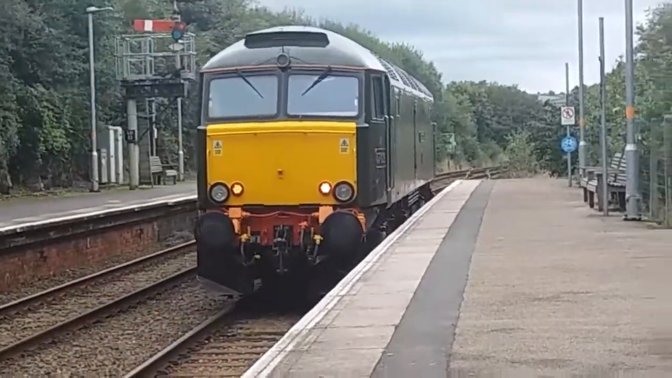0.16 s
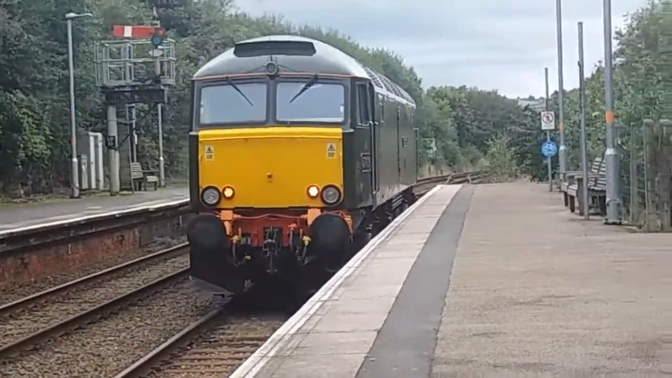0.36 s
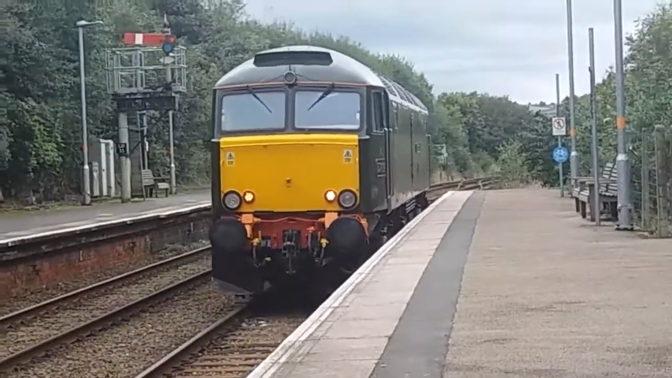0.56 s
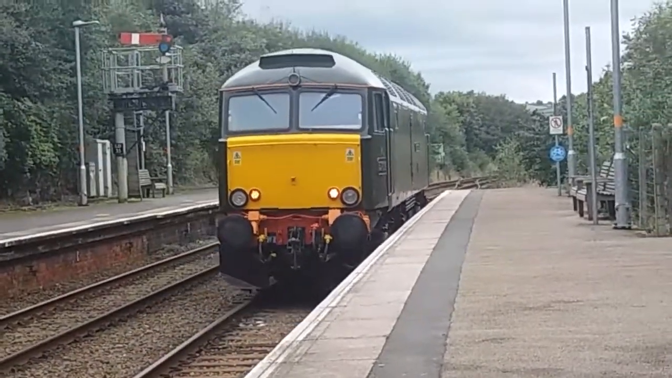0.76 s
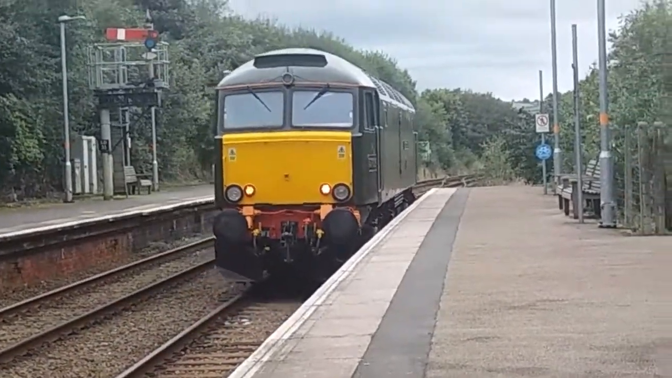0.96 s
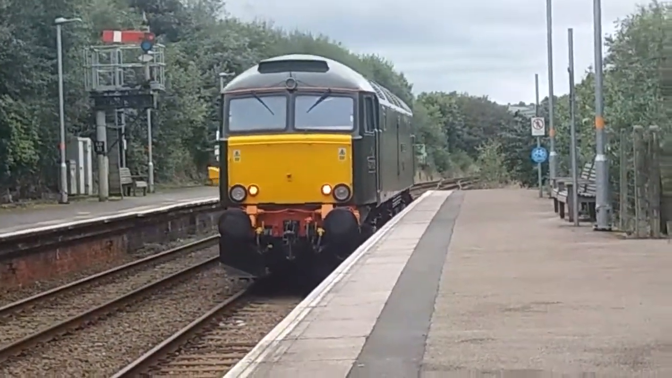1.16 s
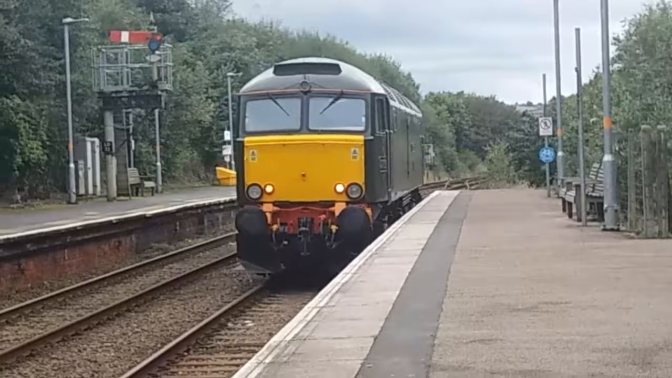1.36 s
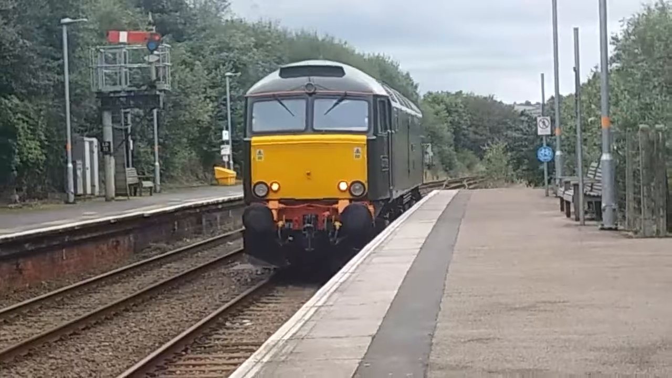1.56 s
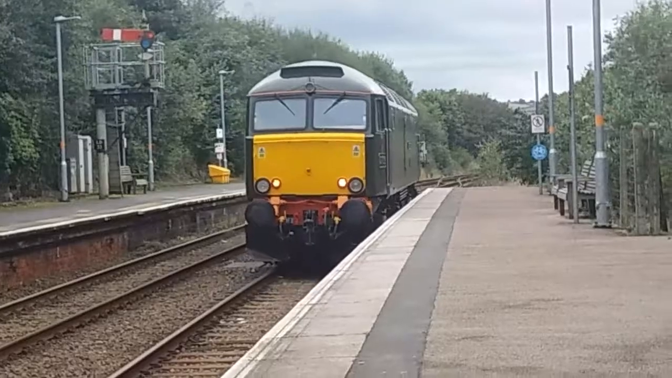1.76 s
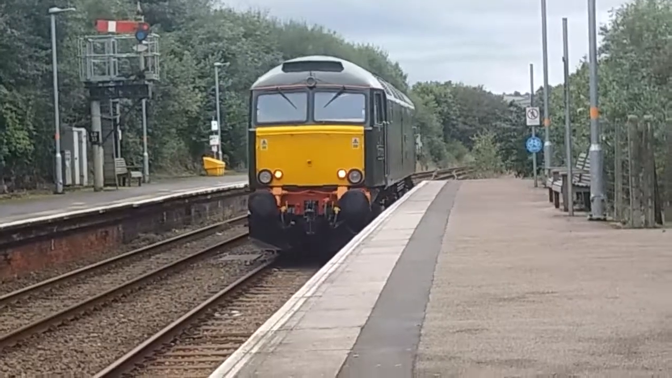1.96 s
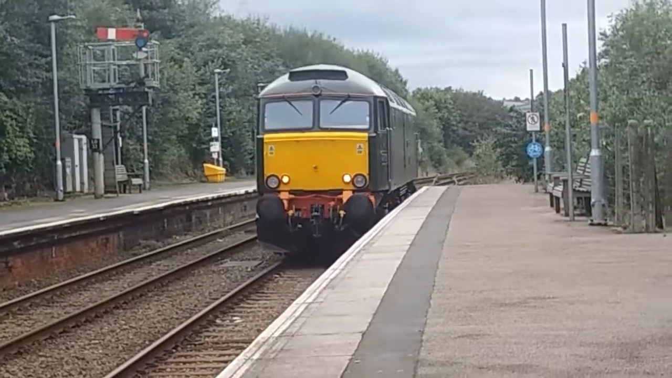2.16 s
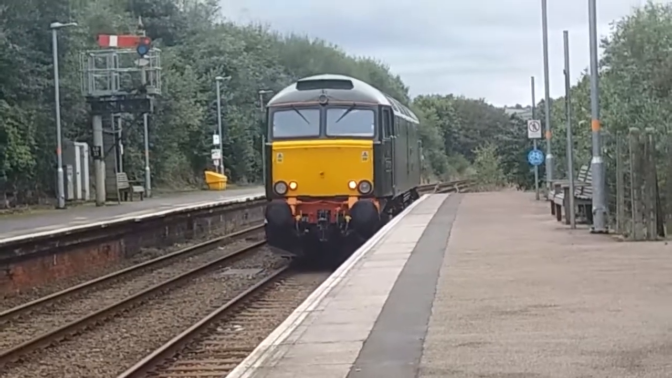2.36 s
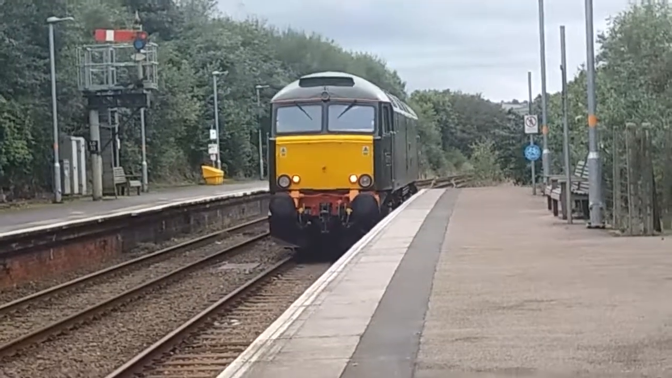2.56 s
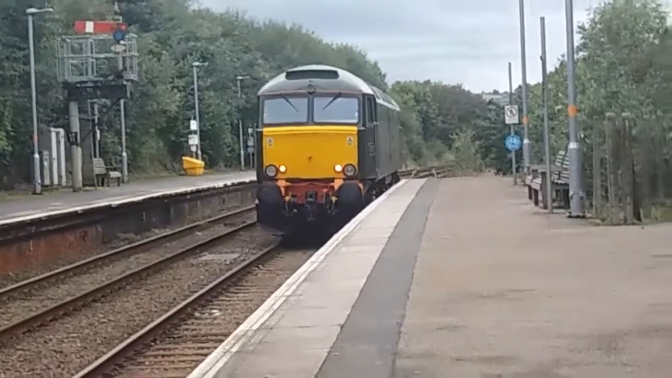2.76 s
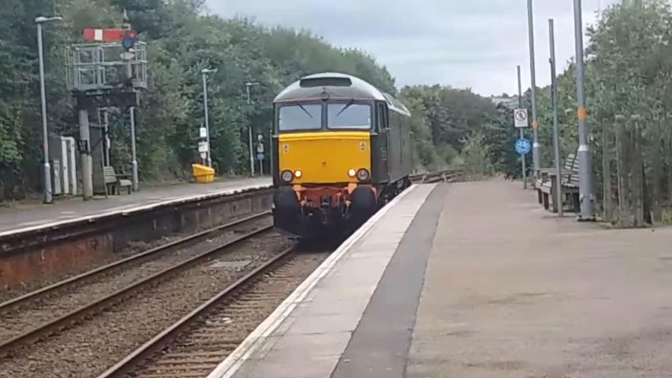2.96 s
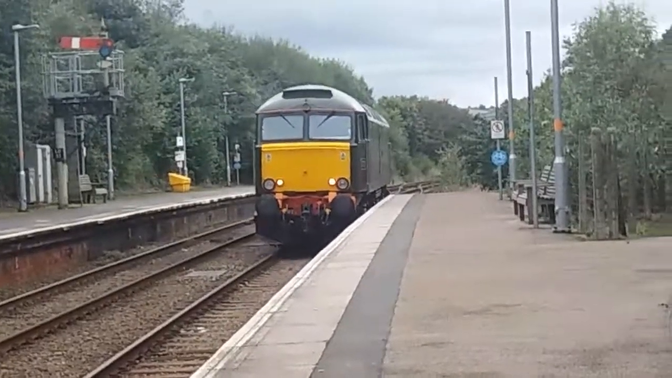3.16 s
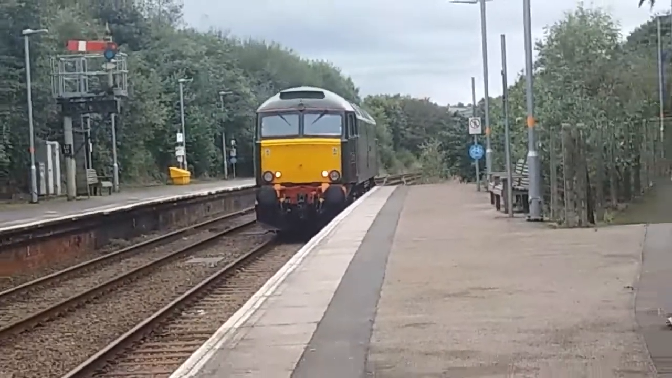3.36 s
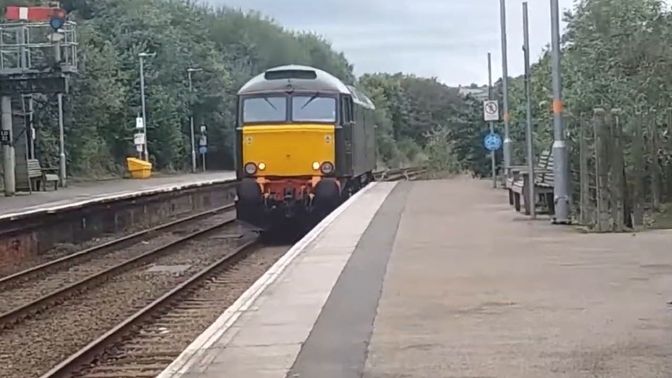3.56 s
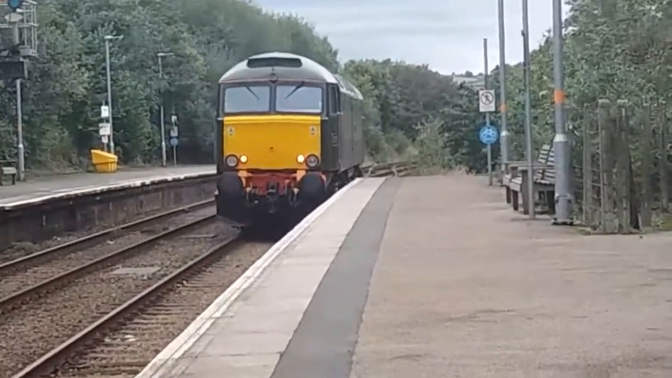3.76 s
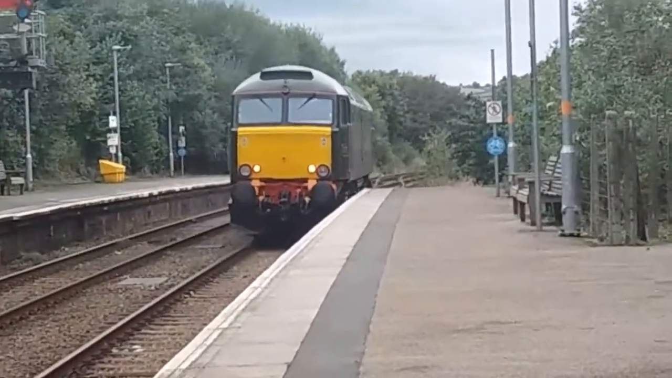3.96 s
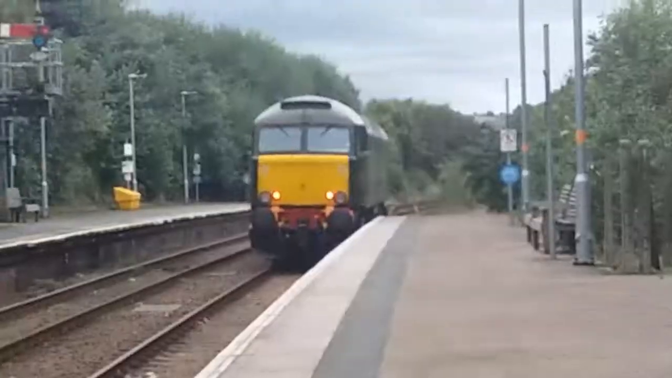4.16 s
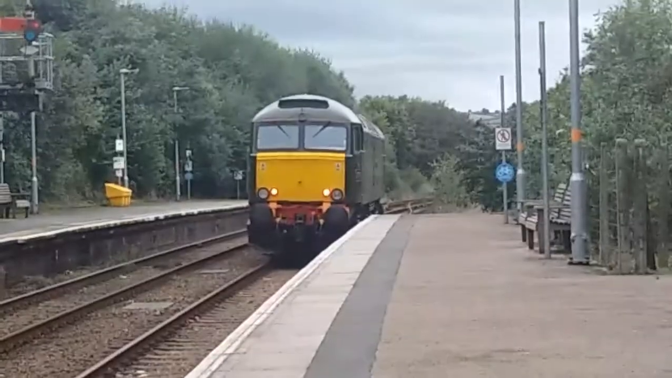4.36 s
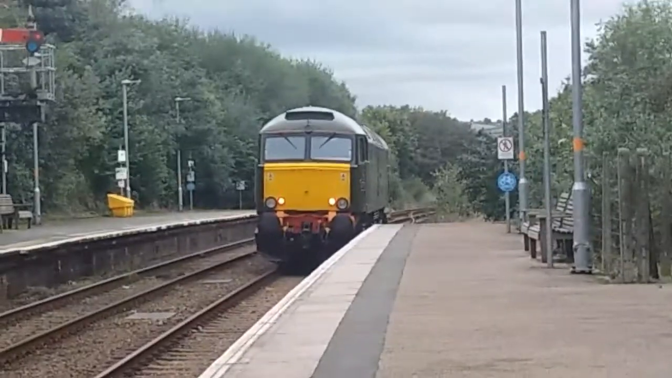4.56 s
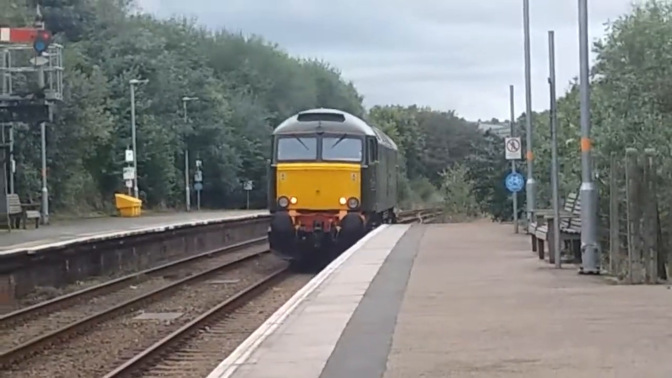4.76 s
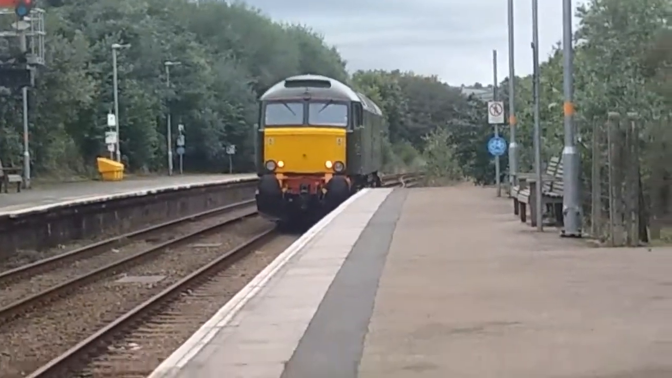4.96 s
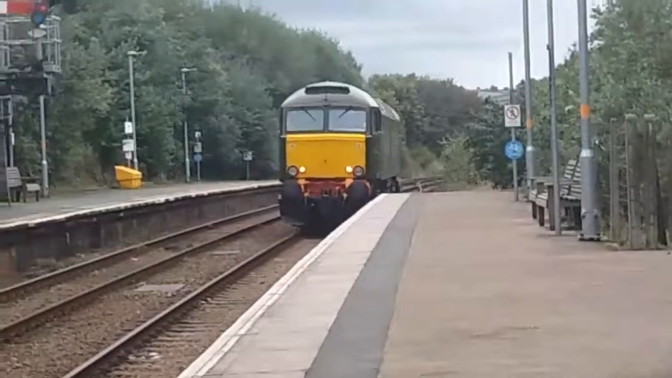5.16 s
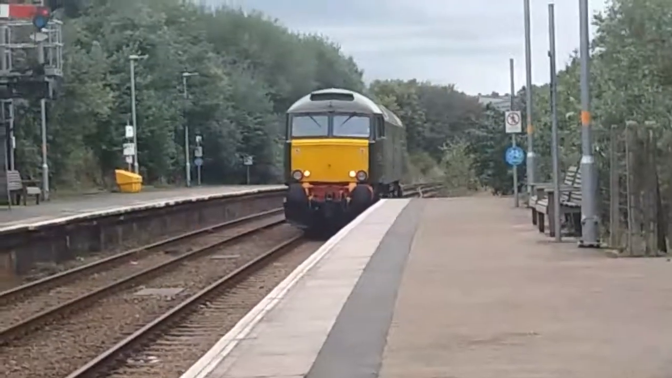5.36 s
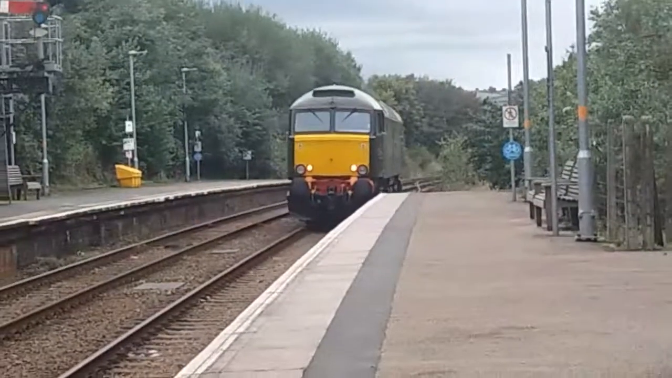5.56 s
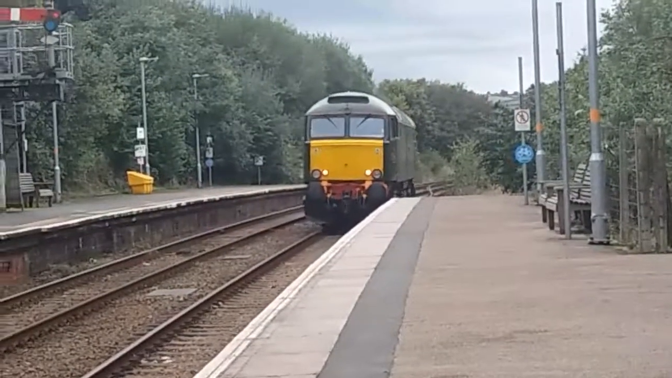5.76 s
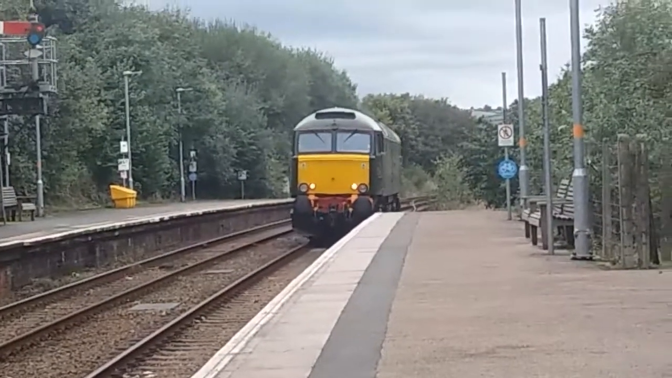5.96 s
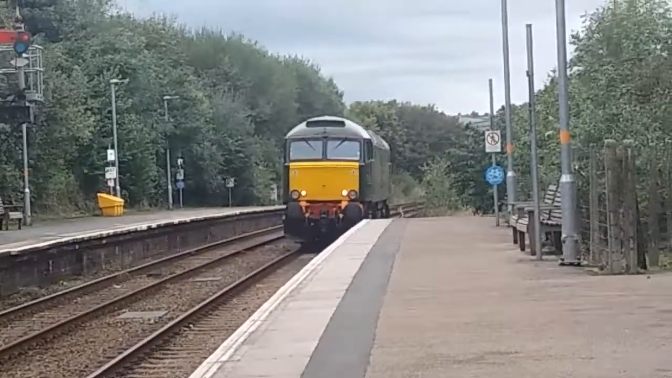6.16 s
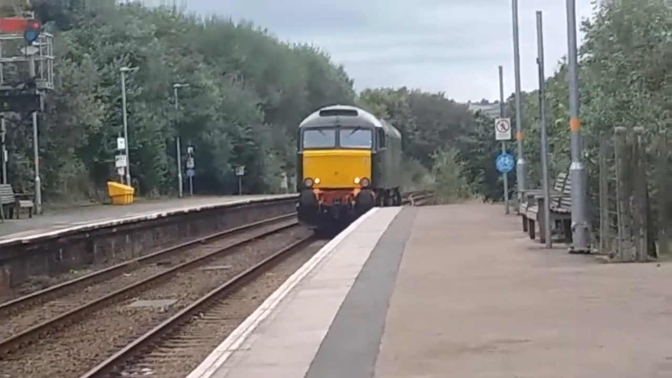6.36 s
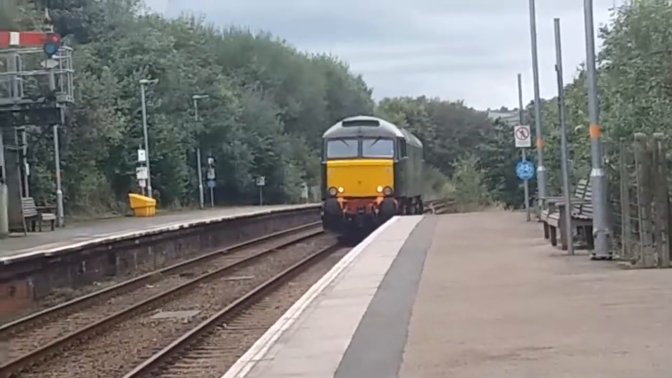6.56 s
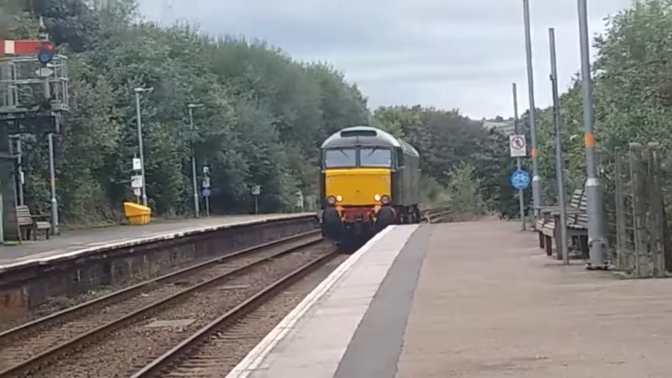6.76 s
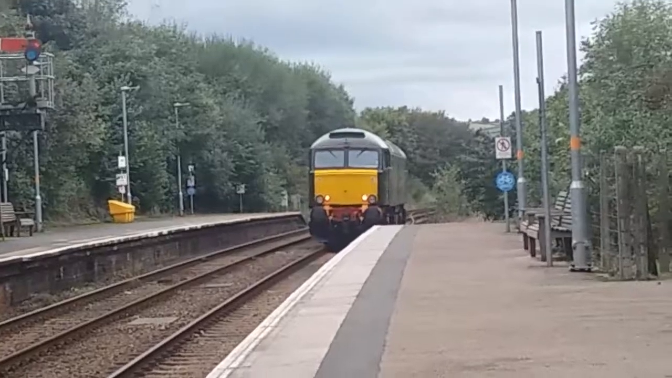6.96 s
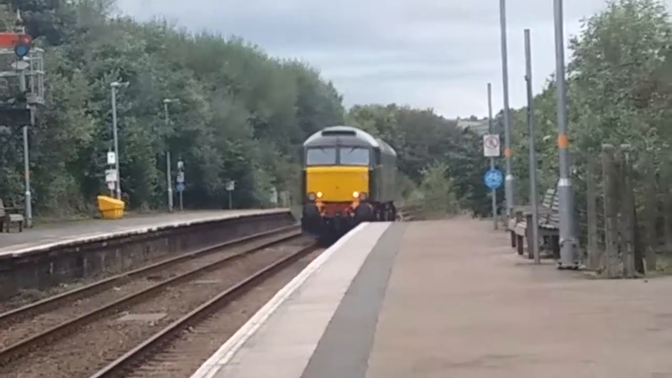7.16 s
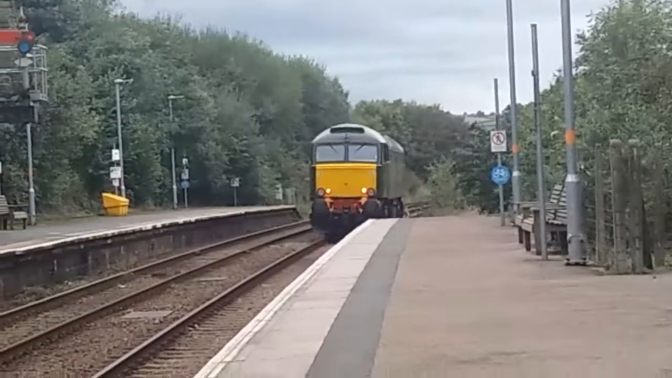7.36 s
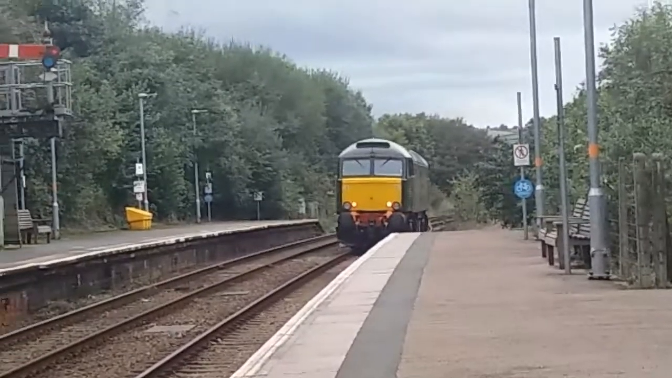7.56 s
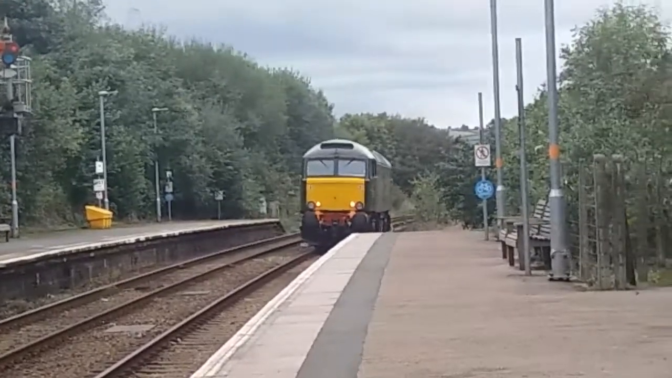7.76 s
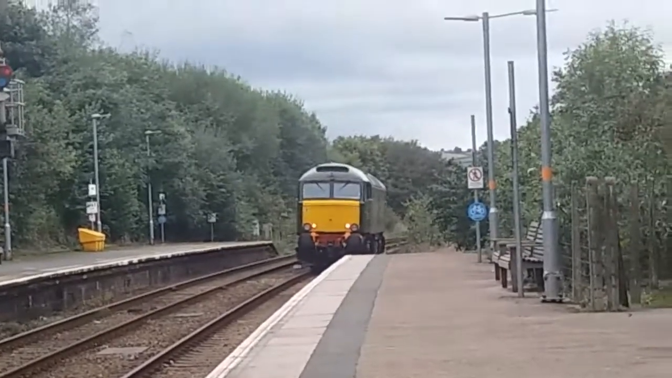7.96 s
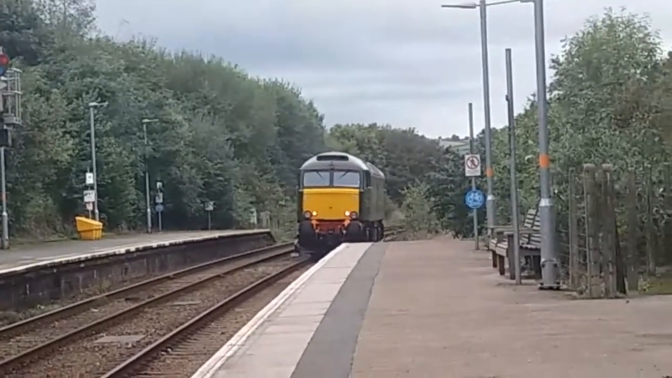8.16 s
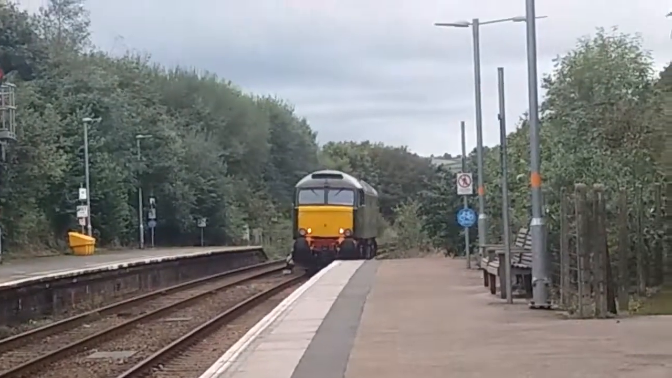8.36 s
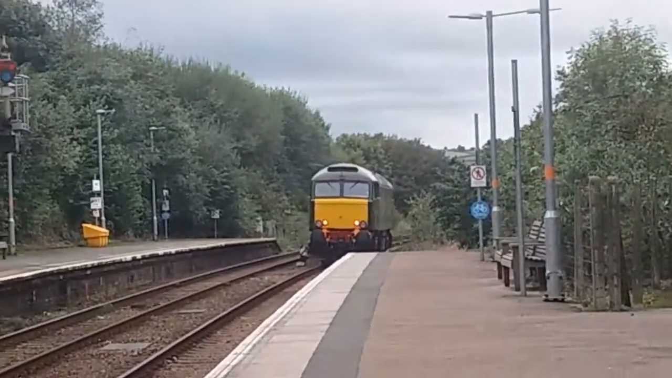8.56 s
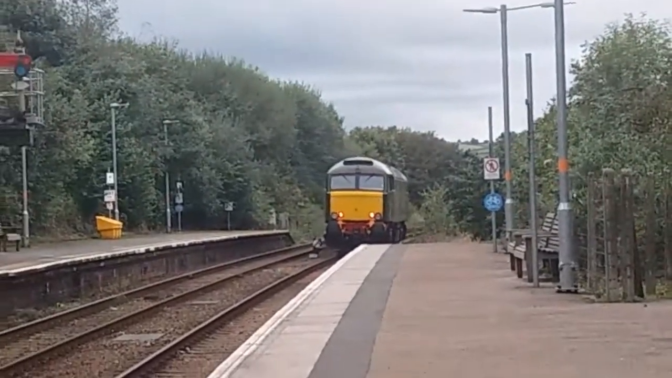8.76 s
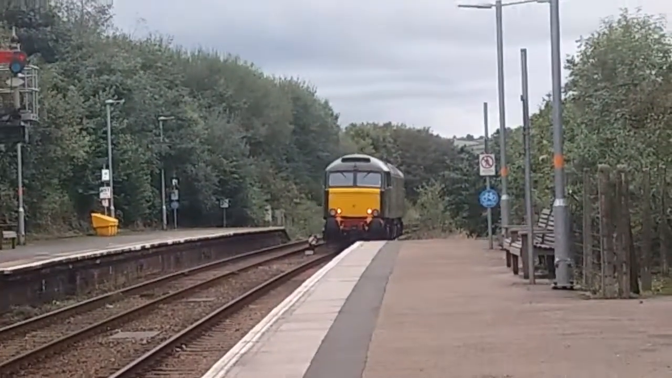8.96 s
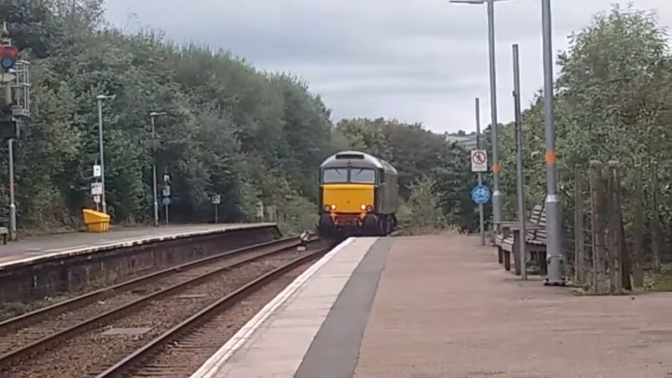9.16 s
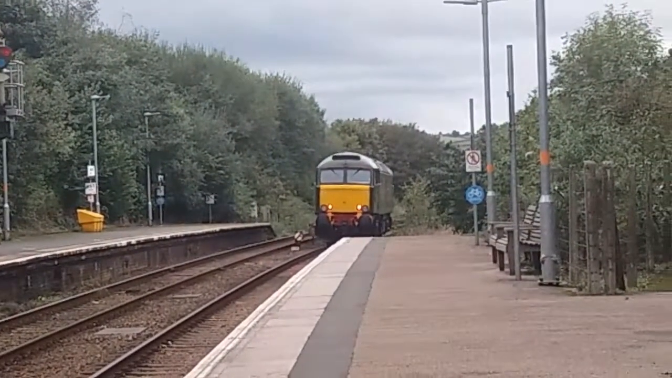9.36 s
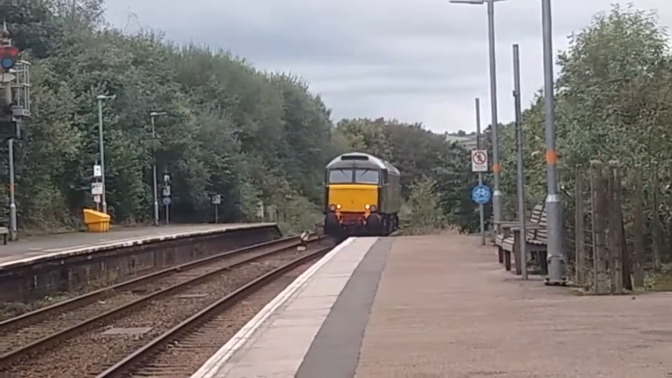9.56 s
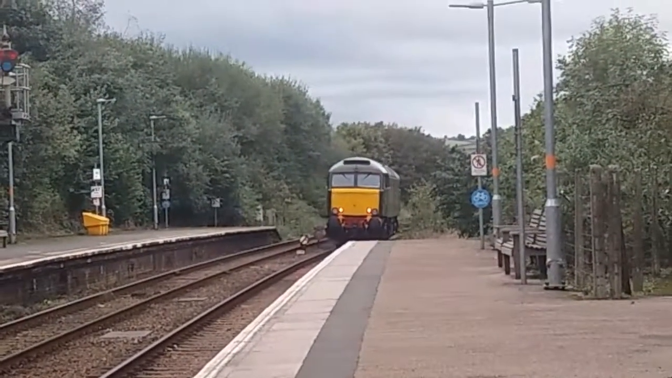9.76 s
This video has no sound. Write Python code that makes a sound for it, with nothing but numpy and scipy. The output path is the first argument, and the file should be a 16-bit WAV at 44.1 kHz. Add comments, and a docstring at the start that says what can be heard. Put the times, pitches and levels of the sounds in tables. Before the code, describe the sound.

A diesel locomotive throbs deeply away from a station platform, its knock and whine holding, then dropping in pitch and fading into the distance.

```python
"""Diesel locomotive leaving a station

A diesel locomotive draws away along a platform. The engine holds its speed, is throttled back, coasts down
with its knock much weakened and settles at a lower speed. Exhaust beats, knock and geared whines are locked
to the crank angle; roar, rush and rattle are filtered noise. Roar, knock and rattle fade with distance into
the steady noise of the station and the microphone hiss."""
import sys
import numpy as np
from scipy import signal
from scipy.fft import rfft, irfft, next_fast_len
from scipy.io import wavfile
from scipy.ndimage import uniform_filter1d

SR = 44100
rng = np.random.default_rng(int(sys.argv[2]) if len(sys.argv) > 2 else 0)


def to_wav(sig):
    """Store sig (one row per channel, or 1-D mono) as 16-bit WAV at the path in sys.argv[1].

    Samples outside -1..1 are clipped; the rate is SR.
    """
    pcm = np.clip(np.atleast_2d(sig), -1, 1) * 32767
    pcm = np.round(pcm).astype(np.int16)
    wavfile.write(sys.argv[1], SR, pcm.T)  # frames by channels


N = 436590   # samples

PULSES_PER_TURN = 3   # exhaust pulses per crank turn


def exhaust_beats(turns, speed):
    """Fourier series: harmonics of a pulse train in step, coloured by the pipe, with weaker beats between."""
    # level of the exhaust beats: time_s, level_db
    throb = [(0, 2.1), (3, -3), (3.6, -6), (4.5, -4.5), (5.4, -13), (6.2, -11), (7, -14), (7.6, -8),
             (8.6, -8.5), (9.9, -8.5)]
    # how the exhaust passes a beat of this pitch: pitch_hz, gain_db
    pipe = [(41, -28), (45, -26), (50, 1.5), (54, 7), (58, 1.5), (62, 7), (66, -11), (70, 3.5), (74, 2),
            (82, 8)]
    # harmonics of the pulses, as multiples of the crank speed, and their levels in dB before throb and pipe
    beat_orders = (6, 9, 12, 18, 21)
    beats_db = (-34.5, -37, -55.5, -53.5, -60)
    # unequal cylinders add beats between: multiples of crank speed; in step (1) or against (-1)
    uneven_orders = (7, 8, 10)
    uneven_signs = (-1, 1, -1)
    # level of the uneven beats: time_s, then level_db of each
    uneven = [(0, -37.5, -34, -57), (.75, -34, -36.5, -57), (1.3, -38.5, -41, -55.5),
              (1.75, -41.5, -36.5, -39), (2.3, -39.5, -37, -48.5), (2.75, -40.5, -44, -56.5),
              (3.25, -40, -55, -44), (3.75, -41, -47, -55), (4.25, -40, -46, -56), (4.75, -52, -37.5, -49),
              (5.5, -52, -47, -59), (6.25, -47, -53, -73), (6.75, -45, -62, -68), (7.25, -50, -49, -66),
              (8.25, -54, -50.5, -50), (9, -51, -52, -49), (9.9, -58, -59, -47)]

    throb_db, = in_time(throb)
    angle = 2 * np.pi * turns + 0.013 * drift(16.0)
    pulses = 0
    for order, db in zip(beat_orders, beats_db):
        level_db = db + throb_db + at_hz(pipe, order * speed) + 0.43 * drift(5.5)
        pulses = pulses + from_db(level_db) * np.cos(order * angle)
    between = 0
    for order, sign, db in zip(uneven_orders, uneven_signs, in_time(uneven)):
        level = from_db(db + 0.6 * drift(4.6))
        between = between + sign * level * np.cos(order * angle + 0.3 * drift(1.5))
    return -np.sqrt(2) * (pulses + between)


def boom(turns, speed):
    """Resonance: turbulent exhaust noise and passing upper beats excite two low modes."""
    # low resonances: pitch_hz, half_width_hz, noise_db (against the mode's level)
    boom_modes = [(100.34, 5.5, -3.5), (129.4, 4.5, -8)]
    # level of the modes: time_s, lower_db, upper_db
    boom_levels = [(0, -41.5, -42), (1.199, -31.5, -43), (2.399, -31, -35), (3.3, -32, -46.5),
                   (4.2, -33, -35), (4.8, -35.5, -35), (5.3, -44, -31), (5.8, -39.5, -44.5),
                   (6.6, -44, -39.5), (7.2, -37.5, -39.5), (8.2, -40.5, -45.5), (9.9, -46.5, -52)]
    # upper beats: multiples of crank speed, and levels in dB against the mode's level
    upper_orders = (11, 12, 13, 14, 15, 16)
    upper_db = (-3.5, -7, -3.5, -10, -12, -1)
    passing_half_hz = 4.66   # a beat this far from a mode has half its amplitude

    t = np.arange(N) / SR
    beats = [geared(turns, order, db, flutter_db=1.5, wander=0.4)
             for order, db in zip(upper_orders, upper_db)]
    out = 0
    for (hz, half_width, noise_db), level_db in zip(boom_modes, in_time(boom_levels)):
        phase = 2 * np.pi * hz * t
        narrow_noise = drift(half_width) * np.cos(phase) + drift(half_width) * np.sin(phase)
        ringing = from_db(noise_db) * rms_one(narrow_noise)
        passing = sum(beat / (1 + ((order * speed - hz) / passing_half_hz) ** 2)
                      for order, beat in zip(upper_orders, beats))
        out = out + from_db(level_db) * (ringing + passing)
    # a high-pass thins the boom below its modes
    return signal.sosfilt(signal.butter(4, 74, "high", fs=SR, output="sos"), out)


def roar(turns, speed):
    """Amplitude modulation: each exhaust pulse swells a low broadband noise."""
    # spectrum: pitch_hz, relative_db_per_hz
    roar_spectrum = [(30, -63.5), (45, -36), (60, -8), (85, -2), (112, -2.5), (150, -5.5), (200, -12.5),
                     (230, -13.5), (275, -14.5), (350, -22), (430, -28), (600, -26.5), (900, -35.5),
                     (1300, -60.5)]
    # start_db, share of distance loss, dB lost per dB of engine speed, dB lost coasting
    roar_level = (-31, 0.5049, 2.17, -0.4)
    puff_depth = 0.15   # 0-1
    puffs = 1 + puff_depth * np.cos(2 * np.pi * PULSES_PER_TURN * turns)
    return from_db(layer_db(roar_level, speed)) * noise(roar_spectrum, patchy_db=-1.4) * puffs


def knock(turns, speed, count=100):
    """Cyclic impacts: firings, injectors, valves and echoes recur at fixed crank angles, and the panels ring."""
    # how the engine block passes knocks: pitch_hz, relative_db_per_hz
    block_spectrum = [(110, -26), (150, -5.5), (200, 4), (280, -0.5), (323, -7.5), (380, -6), (439, -12.5),
                      (504, -5), (705, -6), (768, -12.5), (927, -25), (1100, -17), (1400, -31),
                      (1820, -49.5), (3000, -100)]
    # body panel resonances: pitch_hz, width_hz, level_db
    panels = [(478, 16, 0), (520, 14, -2), (570, 14, -2), (610, 18, -4), (712, 34, 1)]
    # start_db, share of distance loss, dB lost per dB of engine speed, dB lost coasting
    knock_level = (-37.5, 0.68, 1.54, 12)
    firing_share = 0.5   # extra strength of what recurs with every pulse
    slow_shift, turn_scatter = 1.3, 0.35   # slow and turn-by-turn change of strength

    # the same angles after every pulse, as fractions of a turn
    angles = (rng.random(count) + np.arange(PULSES_PER_TURN)[:, None]).ravel() / PULSES_PER_TURN
    own = rng.choice([-1, 1], (PULSES_PER_TURN, count))
    shared = firing_share * rng.choice([-1, 1], count)
    strengths = (own + shared).ravel()

    laps = int(turns[-1]) + 1
    at = np.searchsorted(turns, (np.arange(laps)[:, None] + angles).ravel())
    shift = rms_one(uniform_filter1d(rng.standard_normal((laps, len(angles))), size=7, axis=0))
    varied = strengths + slow_shift * shift + turn_scatter * rng.standard_normal(shift.shape)
    impacts = np.bincount(at, varied.ravel(), N + 1)[:N]

    block = coloured(impacts, block_spectrum)
    out = block
    for hz, width, db in panels:
        r = np.exp(-np.pi * width / SR)
        feed = [(1 - r * r) / 2, 0, (r * r - 1) / 2]
        back = [1, -2 * r * np.cos(2 * np.pi * hz / SR), r * r]
        out = out + from_db(db) * signal.lfilter(feed, back, block)
    return from_db(layer_db(knock_level, speed)) * rms_one(out)


def rattle(rattle_db):
    """Broadband radiation: mid-frequency noise with the engine's rattle level."""
    # spectrum: pitch_hz, relative_db_per_hz
    rattle_spectrum = [(500, -41.5), (800, 2.5), (1050, 1.5), (1340, -4), (1600, 2.5), (1850, 1.5),
                       (2250, -8), (2600, -9), (3100, -15), (3650, -15), (4000, -29), (4500, -26.5),
                       (5300, -36), (6500, -54)]
    return from_db(rattle_db) * noise(rattle_spectrum, patchy_db=0.66)


def whines(turns, speed, rattle_db):
    """Phase-locked tones: tooth, vane and other tones keep fixed ratios to the crank; some cross resonances."""
    # blower drive whine: time_s, then level_db of the tooth tone, its 2nd and 3rd multiple
    whine = [(0.0, -53.5, -78, -94), (0.22, -57, -71, -101.18), (0.37, -55.5, -63.5, -100),
             (0.52, -47.5, -65, -95), (0.67, -63, -70.46, -89), (0.82, -55, -72, -86),
             (0.97, -54.5, -64, -92.5), (1.12, -57.5, -64.69, -93.4), (1.27, -53, -77, -98),
             (1.42, -57.5, -68, -95), (1.57, -52.5, -70.23, -99.52), (1.72, -58, -64.98, -95),
             (1.87, -59, -76, -96.0), (2.02, -77, -72, -97.5), (2.17, -72, -69.5, -101.96),
             (2.32, -68, -77, -101.9), (2.47, -61.24, -78.13, -93.6), (2.62, -68, -73.77, -93.03),
             (2.77, -64, -76, -83.5), (2.92, -70, -84.66, -91.85), (3.07, -58, -81, -102.79),
             (3.22, -61.81, -71, -89.68), (3.37, -51.5, -73, -90), (3.52, -58, -69, -80),
             (3.67, -61.57, -73, -83), (3.82, -58, -85, -87.27), (3.97, -61, -69, -92),
             (4.12, -59.5, -80, -83), (4.27, -61.42, -72, -77), (4.42, -64, -75, -87.25),
             (4.57, -68.8, -66, -81), (4.72, -77.94, -74, -84), (4.87, -78.41, -74, -81.77),
             (5.02, -75, -75, -86), (5.17, -73, -63.5, -81), (5.32, -70, -75, -84.57),
             (5.47, -74.21, -71.02, -96.33), (5.62, -82.67, -74, -94.38), (5.77, -80.27, -70, -95.25),
             (5.92, -81.59, -73.37, -96.91), (6.07, -77, -69, -92.6), (6.22, -86.61, -73, -95.34),
             (6.37, -80.45, -76, -99.51), (6.52, -87.7, -81.92, -95.59), (6.82, -81.99, -75, -98.68),
             (7.12, -88, -85.18, -95.46), (7.42, -87.97, -72, -107.15), (7.72, -87.78, -97.48, -105.76),
             (8.02, -87.9, -76, -100.71), (8.32, -86.66, -83, -104.96), (8.62, -85.68, -74, -93.03),
             (8.92, -84.74, -73, -98.78), (9.22, -87.16, -70, -99.7), (9.52, -84, -75, -94.74),
             (9.9, -80.77, -73, -105.32)]
    whine_teeth = 197.27   # tones per crank turn
    # the clearest drive tone: time_s, level_db
    hum = [(0, -44.5), (.25, -53), (.4, -60), (1.3, -59), (2.5, -57), (3.3, -72), (3.9, -61.5),
           (4.6, -65.5), (5.2, -61.5), (5.6, -68), (6.1, -61), (6.8, -81), (7.6, -65), (9.9, -66)]
    hum_order = 113   # per crank turn
    # auxiliary drives: tones per crank turn; dB against the rattle's start; share of the rattle's fade
    drive_orders = (87.5, 158, 509.6, 521.4)
    drives_db = (-21, -7.5, -39.5, -38.5)
    drives_follow = (0.22, 0.76, 0.51, 0.4)
    # how the casing passes a drive tone: pitch_hz, gain_db
    casing = [(595, 11.5), (625, -1.5), (670, -11.5), (800, -6), (1100, -1), (1180, -6), (1320, -9),
              (1390, -9.5), (1435, -6), (3530, -2.5), (3590, 7), (3640, 9.5), (3690, -3), (3800, -7),
              (4100, -10), (4200, -5), (4270, 8.5), (4350, 2), (4420, -10.5), (4750, -11)]
    # further tones locked to the crank that fade with the rattle: tones_per_turn, relative_db (among themselves)
    crank_tones = [ (4, -15), (5, -6), (33, -1), (30, -4), (39, 0), (79, -9), ]

    out = geared(turns, hum_order, in_time(hum)[0], 2, 0.45)
    for multiple, db in enumerate(in_time(whine), start=1):
        out = out + geared(turns, multiple * whine_teeth, db, 3.2, 0.3 * multiple, flutter_hz=13)
    for order, db, share in zip(drive_orders, drives_db, drives_follow):
        fade_db = share * (rattle_db - rattle_db[0])
        level_db = rattle_db[0] + db + fade_db + at_hz(casing, order * speed)
        out = out + geared(turns, order, level_db, 3.5, 0.6, flutter_hz=15)
    for order, db in crank_tones:
        out = out + geared(turns, order, rattle_db + db - 3.5, 4.3, 0.74)
    return out


def geared(turns, order, level_db, flutter_db, wander, flutter_hz=5.1):
    """Phase locking: a sine follows the crank; air on the long path makes phase waver and level dip."""
    phase = 2 * np.pi * (order * turns + rng.random()) + wander * drift(10.7)
    flutter = flutter_db * np.minimum(drift(flutter_hz), 0.6)   # dips go deeper than swells
    return np.sqrt(2) * from_db(level_db + flutter) * np.sin(phase)


def airy_rush(speed):
    """Band-limited noise: a coarse rush of air that fades with distance, a little lifted while coasting."""
    # spectrum: pitch_hz, relative_db_per_hz
    airy_spectrum = [(1400, -19), (1600, -8), (1850, 3), (2030, -8), (2150, -27.5)]
    # start_db, share of distance loss, dB lost per dB of engine speed, dB lost coasting (negative: gained)
    airy_level = (-70.5, 1.5, -5, -1.5)
    return from_db(layer_db(airy_level, speed)) * noise(airy_spectrum, patchy_db=3.0)


def thud():
    """Tone burst: a Gaussian envelope makes a short dull knock near 470 Hz."""
    # dull knock: centre_s, peak_db
    thuds = [(2.838, -29)]
    t = np.arange(N) / SR
    out = 0
    for s, db in thuds:
        envelope = np.exp(-((t - s) / 0.003) ** 2)
        out = out - from_db(db) * envelope * np.cos(2 * np.pi * 470 * (t - s))
    return out


def station_background():
    """Diffuse field: steady coloured noise stands for the quiet of the station."""
    # spectrum: pitch_hz, relative_db_per_hz
    station_spectrum = [(200, -20.5), (300, -9), (450, -17), (600, -6.5), (1100, -10.5), (1800, -20),
                        (2500, -23.5), (3400, -28), (4400, -33.5), (5500, -41), (7000, -58)]
    return from_db(-58) * noise(station_spectrum, patchy_db=0.5)


def layer_db(level, speed):
    """Distance law: a layer's level follows the log of distance, engine speed and the cut in fuel."""
    start_m, rolling_m_per_s, gain_m_per_s2 = 21.8, 6.24, 0.64   # distance, speed, acceleration
    fuel_off_s, fuel_off_takes_s = 5.15, 0.57
    fuel_on_s, fuel_on_takes_s = 6.98, 0.52

    start_db, far_share, speed_share, coast_db = level
    t = np.arange(N) / SR
    distance = start_m + rolling_m_per_s * t + gain_m_per_s2 * t ** 2 / 2
    distance_db = 20 * np.log10(distance / start_m)
    speed_db = 20 * np.log10(speed / speed[0])
    fuel_cut = np.clip((t - fuel_off_s) / fuel_off_takes_s, 0, 1)
    fuel_back = np.clip((t - fuel_on_s) / fuel_on_takes_s, 0, 1)
    coasting = fuel_cut - fuel_back
    return start_db - far_share * distance_db + speed_share * speed_db - coast_db * coasting


def from_db(db):
    """Logarithmic level: decibels to amplitude gain."""
    return 10 ** (np.asarray(db) / 20)


def rms_one(x):
    """Normalisation: scale to rms 1."""
    return x / np.sqrt(np.mean(np.abs(x) ** 2) + 1e-20)


def in_time(rows):
    """Linear interpolation: each column of a curve, sample by sample."""
    s, *columns = np.transpose(rows)
    return [np.interp(np.arange(N) / SR, s, column) for column in columns]


def at_hz(points, hz):
    """Frequency response: read a curve at moving pitches on a log scale."""
    curve_hz, curve_db = np.array(points).T
    return np.interp(np.log(hz), np.log(curve_hz), curve_db)


def drift(corner_hz):
    """Low-passed chance: noise twice through a one-pole filter; spread 1."""
    step = 40   # drawn at every 40th sample, then interpolated
    r = np.exp(-2 * np.pi * corner_hz * step / SR)
    white = rng.standard_normal(N // step + 2002)
    slow = signal.lfilter([1], [1, -2 * r, r * r], white)[2000:]   # skip the filter's onset
    return np.interp(np.arange(N) / step, np.arange(len(slow)), rms_one(slow))


def coloured(x, spectrum):
    """Linear filtering: give a flat signal the spectrum, virtually silent outside it; rms 1."""
    size = next_fast_len(N)
    hz = np.fft.rfftfreq(size, 1 / SR) + 1e-9   # keeps the log finite at zero
    curve_hz, curve_db = np.array(spectrum).T
    gain = from_db(np.interp(np.log(hz), np.log(curve_hz), curve_db, left=-200, right=-200))
    return rms_one(irfft(rfft(x, size) * gain, size)[:N])


def noise(spectrum, patchy_db):
    """Random modulation: coloured noise whose level wanders a little."""
    return coloured(rng.standard_normal(N), spectrum) * from_db(patchy_db * drift(14.0))


def scene():
    """Superposition: engine layers add to the station background."""
    # crankshaft as heard, holding, throttled back, settling: time_s, turns_per_s
    crank_speed = [(0, 9.098), (1, 9.095), (3.3, 9.042), (3.6, 9.002), (4.2, 8.686), (4.5, 8.464),
                   (5.1, 8.274), (5.4, 8.147), (6.3, 7.6), (7.2, 7.095), (7.5, 7.023), (8, 6.975),
                   (9, 6.915), (9.9, 6.888)]
    # start_db, share of distance loss, dB lost per dB of engine speed, dB lost coasting
    rattle_level = (-43, 1.24, 4, 3.5)

    speed, = in_time(crank_speed)
    turns = np.cumsum(speed) / SR
    rattle_db = layer_db(rattle_level, speed)
    engine = exhaust_beats(turns, speed) + boom(turns, speed) + roar(turns, speed)
    engine += knock(turns, speed) + rattle(rattle_db)
    engine += whines(turns, speed, rattle_db) + airy_rush(speed)
    return (engine + thud() + station_background())[None]


def record(dry):
    """Additive noise and band limiting: the microphone adds its hiss; the top is cut."""
    # hiss spectrum: pitch_hz, relative_db_per_hz
    hiss_spectrum = [(3000, -18), (5500, -11), (8000, -12), (11000, -9.5), (13000, -7), (14500, -5.5),
                     (15600, -3), (17000, 0.5)]
    cutoff_hz = 15730
    hiss = from_db(-74) * coloured(rng.standard_normal(N), hiss_spectrum)
    low_pass = signal.ellip(14, 0.3, 70, cutoff_hz, fs=SR, output="sos")
    return signal.sosfilt(low_pass, dry + hiss)


dry = scene()
out = record(dry)
to_wav(out)
```